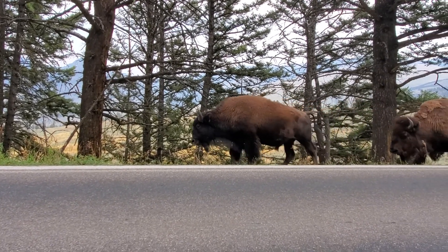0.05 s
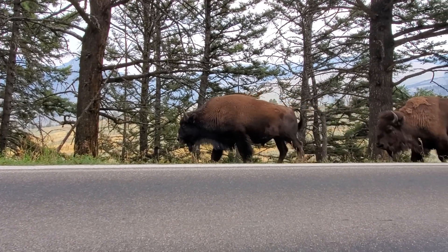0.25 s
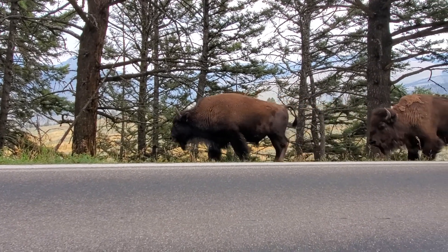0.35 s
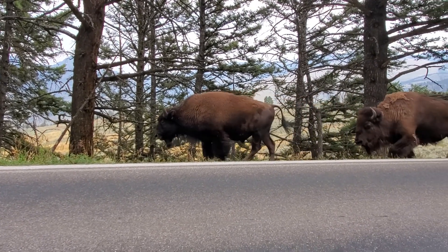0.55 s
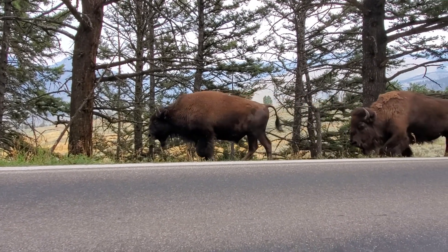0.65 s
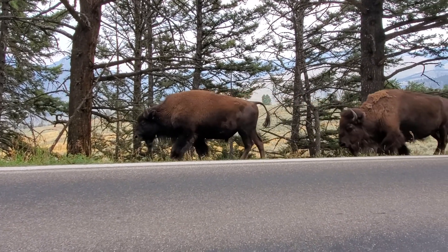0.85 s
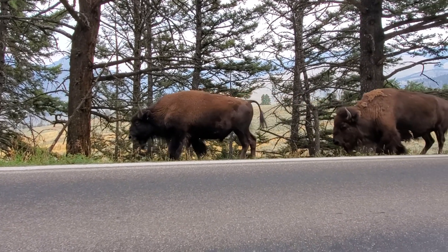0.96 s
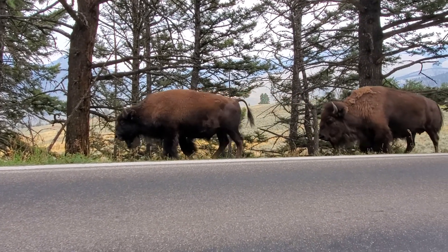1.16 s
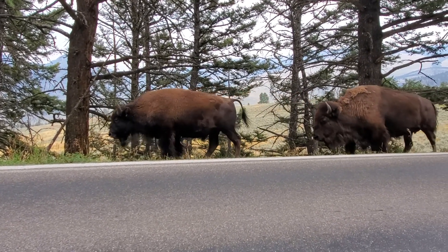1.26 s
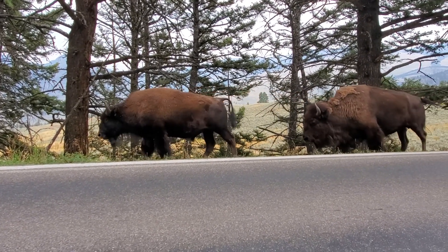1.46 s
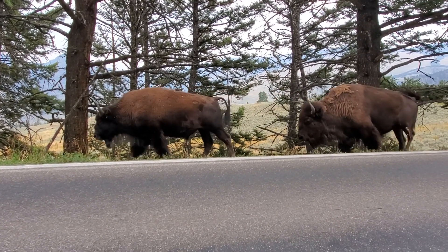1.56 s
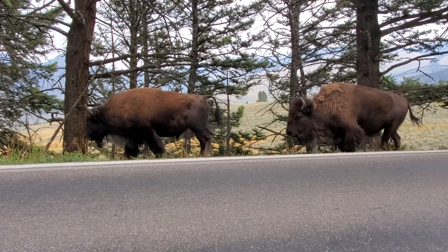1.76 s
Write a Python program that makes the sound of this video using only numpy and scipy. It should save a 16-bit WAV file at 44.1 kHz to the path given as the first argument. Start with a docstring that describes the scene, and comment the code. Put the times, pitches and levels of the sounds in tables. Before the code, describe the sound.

A bison bellows outdoors, some metres away and slightly left. After a faint swish of hooves in dry grass, the low, rough, rattling call runs from about 0.2 to 0.7 seconds, with hissing breath and a thin wheeze. A softer closed-mouth grumble starts near 0.9 seconds, peaks as a grunt around 1.2 and fades in slow pulses by 1.8. Faint twig cracks and low wind lie underneath.

```python
"""Bison bull on a roadside

A bull bellows twice as he walks among pines, some metres off and a little left of the microphones.
Slow, uneven beats of the vocal folds ring his open throat, with hissing air and a thin wheeze; the
second call is a softer closed-mouth grumble that dies away. Hooves brush dry grass, crack twigs and
knock on the earth, the trees scatter a little sound back, and faint wind rumbles underneath."""
import sys
import numpy as np
from scipy import signal
from scipy.fft import rfft, irfft
from scipy.io import wavfile
from scipy.ndimage import uniform_filter1d, map_coordinates

SR = 44100
rng = np.random.default_rng(int(sys.argv[2]) if len(sys.argv) > 2 else 0)


def generate_wav(signal):
    """Clip the signal to [-1, 1] and save it as 16-bit WAV at the path in sys.argv[1]."""
    frames = np.transpose(np.atleast_2d(signal))
    scaled = np.clip(frames, -1, 1) * 32767
    pcm = np.round(scaled).astype(np.int16)
    wavfile.write(sys.argv[1], SR, pcm)


N = 79380
T = np.arange(N) / SR

# Wind and distant noise. Each row: frequency in Hz, gain in dB.
WIND_COLOUR = [(15, -31), (45, 4.5), (85, -3.5), (120, -0.5), (190, -3.5), (270, -7.5), (380, -15.5),
               (700, -17), (1200, -29.5), (2000, -26.5), (4000, -30), (6000, -33.5), (8500, -40.5),
               (12000, -36.5), (16000, -51)]
# The wind's rumble. Each row: time in seconds, gain in dB.
WIND_GUSTS = [(0, -8), (.06, 3), (.16, 3), (.22, 7.5), (.7, 9), (.81, 2), (.88, 5.5), (1.0, 8), (1.14, 6.5),
              (1.26, 9), (1.4, 5.5), (1.58, 2.5), (1.8, -2.5)]
# Air through the mouth. Each row: time in seconds, gain in dB.
BREATH_LEVEL = [(0, -36), (.12, -2.5), (.25, -2), (.35, 4), (.46, 4.5), (.6, 4.5), (.7, 3), (.79, -3),
                (1.0, -13.5), (1.2, -8), (1.35, -10.5), (1.55, -11.5), (1.8, -19)]
# Its hiss. Each row: frequency in Hz, gain in dB.
BREATH_COLOUR = [(300, -7), (800, 21.5), (1300, 21), (1750, -3), (2100, -3), (2600, 3), (3000, 4),
                 (3300, -1.5), (3700, 7.5), (4100, -1), (4450, 0.5), (4750, -0.5), (5200, -8.5),
                 (6000, 0.5), (8500, -5.5), (9900, -2.5), (12000, -4), (14500, -0.5), (16000, -12)]
# Twig cracks and, in the last two rows, hoof knocks on earth. Each row: start in seconds,
# level in dB averaged over the scene, centre and width in Hz, decay in seconds.
CRACKS_AND_KNOCKS = [(.032, -75, 2580, 1200, 0.021), (0.123, -68, 7260, 7200, 0.011),
                     (0.167, -70, 9600, 9000, 0.0035), (0.235, -72, 6140, 3960, 0.0054),
                     (.259, -72.5, 11100, 7940, 0.0072), (1.057, -67.5, 2350, 2200, 0.0099),
                     (1.432, -72, 3500, 900, .007), (1.599, -75, 11100, 5000, 0.013),
                     (1.504, -75.5, 1490, 2980, 0.008), (1.707, -66, 700, 704, .006)]
# Grass swishes and one long whistle of air near 1300 Hz.
# Each row: peak time and spread in seconds, level in dB, centre and width in Hz.
SWISHES_AND_WHISTLE = [(0.12, 0.04, -56.5, 6200, 4960), (0.154, 0.1, -56.5, 11400, 6200),
                       (0.113, 0.03, -52.5, 700, 398), (0.17, 0.37, -53, 1290, 298),
                       (0.827, 0.12, -57.5, 1080, 575), (1.266, 0.26, -65, 6330, 2000)]

# Beat of the vocal folds; the grumble keeps dropping an octave. Each row: time in seconds, rate in Hz.
BELLOW_RATE = [(.2265, 36.1), (.30, 45.9), (.36, 35.4), (.39, 51.3), (.45, 46.1), (.52, 51.9), (.56, 38.3),
               (.65, 38.8), (.73, 24.4)]
GRUMBLE_RATE = [(.92, 37.8), (1.02, 32.4), (1.08, 58.4), (1.14, 63.2), (1.175, 29.6), (1.225, 61.9),
                (1.265, 29.6), (1.295, 61.4), (1.33, 27.4), (1.37, 47), (1.43, 24.2), (1.75, 18.7)]
# Effort behind the folds. Each row: time in seconds, gain in dB, loss on every second beat in dB.
BELLOW_DRIVE = [(.22, -8, -5), (.277, -3, 3.5), (.31, -1.5, 3), (0.36, 7.5, 2.5), (0.392, -1.5, 0),
                (0.481, 6, 15), (0.534, -6.5, -3.5), (0.573, 1, -5), (.64, 1, 4.5), (.70, -4.5, -2),
                (.745, -27, -4.5)]
GRUMBLE_DRIVE = [(.92, -9.5, -4.5), (1.129, -14.5, -12), (1.183, 11, 0), (1.222, 4, -1), (1.272, 14.5, 2.5),
                 (1.32, 5.5, 11), (1.39, -10, 0.5), (1.429, -4, -6), (1.51, -6, 16), (1.55, -9.5, 13),
                 (1.8, -21, -13)]
# Strength of the hard snap in the bellow. Each row: time in seconds, gain in dB.
SNAP_STRENGTH = [(.22, 0.5), (.277, 2), (.32, -9.5), (.375, 0.5), (.415, -1), (.46, -4), (.5, 6), (.56, -7),
                 (.615, 7), (.645, -7), (.7, 4.5)]
# The bellow's resonances: open throat, upper throat, grainy noise and wheeze.
# Each row: frequency in Hz, gain in dB.
BELLOW_THROAT = [(25, -10), (50, 4), (110, 2.5), (190, -7), (250, -3.5), (300, -5), (370, 0), (470, -9),
                 (540, -15), (630, -11), (760, -22.5), (900, -40), (1100, -20.5), (1300, -21.5),
                 (1550, -28.5), (1800, -26.5), (2200, -65.5)]
UPPER_THROAT = [(150, -34.5), (300, -5.5), (400, -4.5), (480, 3), (560, -5), (630, 5.5), (700, -9.5),
                (800, -23), (1000, -26), (1300, -20), (1550, -54), (1800, -67), (2300, -50), (6000, -43)]
GRIT_RING = [(400, -45), (1300, 4.5), (2100, -6.5), (4000, -8), (9000, -44)]
WHEEZE_RING = [(2500, -39), (4100, -18), (4700, 1), (5300, -34), (5750, -11.5), (6400, -23), (11500, -34),
               (14800, -15)]
# Flares of the wheeze. Each row: peak time and spread in seconds, gain in dB.
FLARES = [(0.436, .004, 5.5), (0.476, 0.0025, -1), (0.543, 0.0064, -4), (.709, 0.004, -13)]
# Tones of nose and throat; an end ahead of the peak cuts the swell short.
# Each row: start, peak and end in seconds, first and last pitch in Hz, level at full swell in dB.
MOAN_TONES = [(0.2886, 0.317, 0.359, 300, 224.2, -24.5), (0.29, 0.44, .5, 260, 170, -30),
              (.31, 0.43, 0.35, 1100, 2000, -40), (.98, 1.126, 1.185, 348, 308, -30.5),
              (.47, 0.574, .68, 175, 111.2, -26.5)]
# The grumble's resonances: nasal hum, closed-mouth grunt, slack throat and parted lips.
# Each row: frequency in Hz, gain in dB.
NASAL_RING = [(60, -0.5), (230, -6.5), (350, 1), (470, -23.5), (1400, -38)]
GRUNT_RING = [(25, -14), (60, 6), (110, -8.5), (160, 9), (230, 5), (280, -4), (400, -0.5), (480, -32),
              (650, -22), (760, -23), (860, -16.5), (980, -64), (1110, -36), (1400, -28.5)]
SLACK_RING = [(25, 3), (50, 9), (100, -4.5), (150, 2.5), (230, -3), (300, -18), (410, -9.5), (500, -29),
              (1100, -67), (1800, -31)]
LIP_RING = [(300, -37), (500, 1), (590, 11), (740, 0.5), (870, 13), (980, 7), (1120, 15.5), (1300, -10),
            (1700, -10), (2200, -8), (4000, -24.5)]
# The lips part briefly. Each row: time in seconds, gain in dB.
LIP_OPENING = [(1.135, -63), (1.158, 1.5), (1.2, 4.5), (1.235, -5), (1.28, 0.5), (1.31, -8), (1.45, -48),
               (1.55, -42)]


def undb(db):
    """Decibels to gain."""
    return 10 ** (np.asarray(db) / 20)


def level(x, db):
    """Set the rms level over the whole scene."""
    return x * undb(db) / np.sqrt(np.mean(x ** 2) + 1e-20)


def curve(table, t, column=1):
    """One column of a table, joined by straight lines."""
    rows = np.array(table, float)
    return np.interp(t, rows[:, 0], rows[:, column])


def colour(x, points):
    """Causal filter with the given (Hz, dB) response."""
    size = 2 ** 17
    hz, db = np.array(points, float).T
    bins_hz = np.maximum(np.arange(size // 2 + 1) * SR / size, 1)
    gain = undb(np.interp(np.log(bins_hz), np.log(hz), db))
    cepstrum = irfft(np.log(gain))
    cepstrum[1:size // 2] *= 2  # fold to minimum phase
    cepstrum[size // 2 + 1:] = 0
    return irfft(rfft(x, size) * np.exp(rfft(cepstrum)))[..., :N]


def band(x, hz, width_hz):
    """Two passes through one resonance."""
    peak = signal.iirpeak(hz, hz / width_hz, SR)
    return signal.lfilter(*peak, signal.lfilter(*peak, x))


def wander(hz):
    """Slow random wandering, spread near 1."""
    hold = int(SR / hz)
    steps = np.repeat(rng.standard_normal(N // hold + 1), hold)
    return np.sqrt(2) * uniform_filter1d(uniform_filter1d(steps, hold), hold)[:N]


def bump(at, spread_s):
    """A bell-shaped rise and fall."""
    return np.exp(-((T - at) / spread_s) ** 2 / 2)


def puffs(closures, decay_s):
    """Turbulence that starts at each closure of the folds and dies away."""
    envelope = signal.lfilter([1], [1, -np.exp(-1 / (decay_s * SR))], closures)
    return envelope * rng.standard_normal(N)


def wind():
    """A swelling rumble, alike at both microphones, under wide faint hiss."""
    mid, side = colour(rng.standard_normal((2, N)), WIND_COLOUR)
    lows = signal.butter(1, 650, fs=SR)
    swell = undb(curve(WIND_GUSTS, T) - 3 * wander(hz=6.1))
    mid = mid + signal.lfilter(*lows, mid) * (swell - 1)
    side = side - 0.74 * signal.lfilter(*lows, side)
    return level(np.array([mid + side, mid - side]), db=-39.5)


def breath(beat_times, steady=.83, puff_s=.0042):
    """Air hisses through the mouth and puffs with every beat."""
    since_beat = T - np.r_[-1, beat_times][np.searchsorted(beat_times, T)]
    flow = (steady + np.exp(-since_beat / puff_s)) * undb(curve(BREATH_LEVEL, T))
    return level(colour(rng.standard_normal(N) * flow, BREATH_COLOUR), db=-47)


def hooves():
    """Hooves crack twigs and knock dully on the earth; each burst dies quickly."""
    out = np.zeros(N)
    for at, db, hz, width, decay in CRACKS_AND_KNOCKS:
        grains = rng.standard_normal(N) * undb(6 * wander(hz=1500))
        burst = grains * (T >= at) * np.exp(-np.abs(T - at) / decay)
        out += level(band(burst, hz, width), db)
    return out


def grass_and_whistle():
    """Grass swishes under hooves, and air gives a long breathy whistle near 1300 Hz."""
    out = np.zeros(N)
    for at, spread, db, hz, width in SWISHES_AND_WHISTLE:
        grains = rng.standard_normal(N) * undb(4.5 * wander(hz=900))
        out += level(band(grains, hz, width), db) * bump(at, spread)
    return out


def folds(rate, drive, jitter_s=.00015, shimmer_db=.6):
    """The vocal folds close once a cycle, unevenly; returns the closures and their times."""
    t = T[T >= rate[0][0]]
    cycles = np.cumsum(curve(rate, t)) / SR
    beat = np.arange(int(cycles[-1]) + 1)
    chance = rng.standard_normal((len(beat), 2))
    times = np.interp(beat, cycles, t) + jitter_s * chance[:, 0]
    alternate_loss = beat % 2 * curve(drive, times, column=2)
    db = curve(drive, times) - alternate_loss + shimmer_db * chance[:, 1]
    voiced = times < min(drive[-1][0], T[-1])
    closures = np.zeros(N)
    closures[(times[voiced] * SR).astype(int)] = undb(db[voiced])
    return closures, times[voiced]


def voice(closures, throat, build_s, rough):
    """Flow builds and is cut off at each closure; turbulence follows; both ring the throat."""
    # filtered backwards, so the flow rises towards each closure
    flow = signal.lfilter([1], [1, -np.exp(-1 / (build_s * SR))], closures[::-1])[::-1]
    flow_drop = -np.diff(flow, append=0)
    turbulence = puffs(closures, decay_s=.02)
    return colour(level(flow_drop, 0) + rough * level(turbulence, 0), throat)


def flesh(x, top_hz=1900):
    """Soft tissue rounds off the top of every beat."""
    return signal.sosfilt(signal.butter(8, top_hz, fs=SR, output="sos"), x)


def bellow(closures):
    """The loud call: sharp, rough beats ring the open throat."""
    return level(voice(closures, BELLOW_THROAT, build_s=.0011, rough=.3), db=-29.5)


def snap(closures):
    """Hard closures ring the upper throat: their snap grows as the square of their strength."""
    strikes = closures ** 2 * undb(curve(SNAP_STRENGTH, T))
    return level(colour(strikes, UPPER_THROAT), db=-38.5)


def grit(closures):
    """Grainy noise fills the throat between the beats."""
    grains = puffs(np.sqrt(closures), decay_s=.025) * undb(5 * wander(hz=350))
    return level(colour(grains, GRIT_RING), db=-55)


def wheeze(closures, start_s=.281, length_s=.44):
    """A reedy rattle of air pulses with the beats and now and then flares."""
    along = np.clip((T - start_s) / length_s, 0, 1)
    rattle = puffs(np.sign(closures), decay_s=.013) * np.sqrt(along * (1 - along))
    flares = sum(undb(db) * bump(at, spread) for at, spread, db in FLARES)
    return level(colour(rattle + flares * rng.standard_normal(N), WHEEZE_RING), db=-55.5)


def moans():
    """Low tones swell, waver and sink as the throat lengthens; one faint high tone darts upward."""
    out = np.zeros(N)
    for start, peak, end, first_hz, last_hz, db in MOAN_TONES:
        hz = np.interp(T, [start, end], [first_hz, last_hz])
        tone = np.exp(2j * np.pi * np.cumsum(hz) / SR)
        swell = np.interp(T, [start, peak, end], [0, 1, 0])
        waver = 1 + .22 * (wander(hz=80) + 1j * wander(hz=80))  # in level and phase
        out += undb(db) * swell * (waver * tone).imag
    return out


def grumble(closures, grunt_at_s=1.15, slacken_at_s=1.319, blend_s=.0035):
    """A nasal hum opens into a grunt, then darkens into separate soft knocks as the throat slackens."""
    opened = .5 + .5 * np.tanh((T - grunt_at_s) / blend_s)
    slack = .5 + .5 * np.tanh((T - slacken_at_s) / blend_s)
    soft_beats = dict(build_s=.0022, rough=.2)
    hum = voice(closures * (1 - opened), NASAL_RING, **soft_beats)
    grunt = voice(closures * opened * (1 - slack), GRUNT_RING, **soft_beats)
    knocks = voice(closures * slack, SLACK_RING, **soft_beats)
    return level(hum, db=-44.5) + level(grunt, db=-40) + level(knocks, db=-42.5)


def rasp(closures):
    """Beats leak out brighter while the lips part."""
    leak = puffs(np.sign(closures), decay_s=.016) * undb(curve(LIP_OPENING, T))
    return level(colour(leak, LIP_RING), db=-52)


def microphones(x, left_db, lag_s=.0003944):
    """The left microphone hears the bull sooner, and louder by left_db."""
    late = map_coordinates(x, [(T - lag_s) * SR], mode="nearest")
    return np.array([x * undb(left_db / 2), late * undb(-left_db / 2)])


def trees(x, db, t60_s=.24):
    """A thin, short scatter from trunks and ground, different at each microphone."""
    tail = rng.standard_normal((2, N)) * undb(-60 * T / t60_s) * (T > .004)
    tail /= np.sqrt(np.sum(tail ** 2, axis=1, keepdims=True))
    return undb(db) * signal.fftconvolve(x[None], tail, axes=1)[:, :N]


def scene():
    """The bull's calls, breath and hooves from some metres off, among pines and wind."""
    loud, loud_times = folds(BELLOW_RATE, BELLOW_DRIVE)
    soft, soft_times = folds(GRUMBLE_RATE, GRUMBLE_DRIVE)
    beat_times = np.r_[loud_times, soft_times]
    calls = flesh(bellow(loud) + grumble(soft)) + moans() + rasp(soft)
    snaps = flesh(snap(loud))
    # hiss arrives directly and as unrelated scatter on each side
    hiss, *hiss_scatter = (breath(beat_times) + grass_and_whistle() for _ in range(3))
    crisp = grit(loud) + wheeze(loud) + hooves()
    direct = microphones(calls, left_db=.85) + microphones(snaps, left_db=2)
    direct += microphones(hiss + crisp, left_db=0)
    scatter = trees(calls + snaps + crisp, db=-9.5) + undb(-.5) * np.array(hiss_scatter)
    return direct + scatter + wind()


def record(dry, low_hz=30, top_hz=15600):
    """The recorder cuts the deepest rumble, rounds the loudest peaks and cuts the top."""
    trimmed = signal.sosfilt(signal.butter(2, low_hz, "high", fs=SR, output="sos"), dry)
    rounded = np.tanh(1.6 * trimmed) / 1.6
    return signal.sosfilt(signal.ellip(10, .2, 80, top_hz, fs=SR, output="sos"), rounded)


dry = scene()
out = record(dry)
generate_wav(out)
```